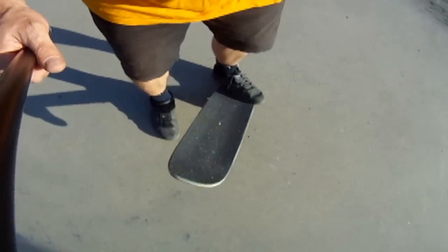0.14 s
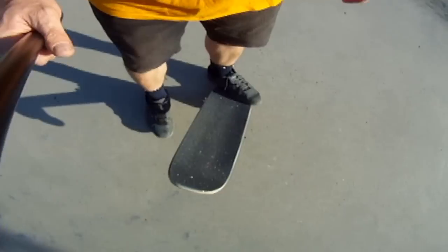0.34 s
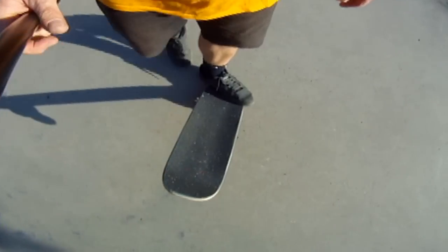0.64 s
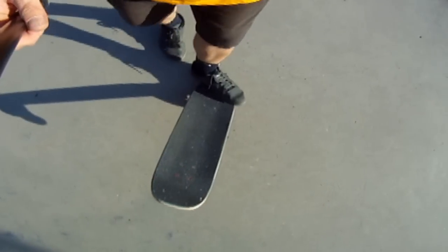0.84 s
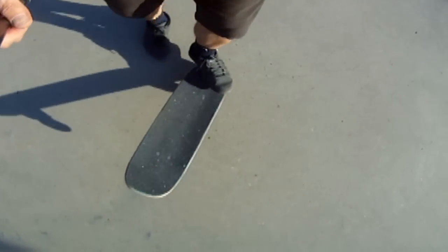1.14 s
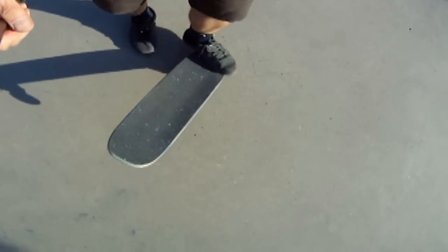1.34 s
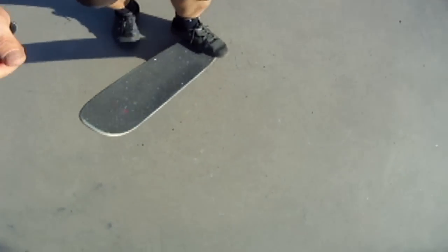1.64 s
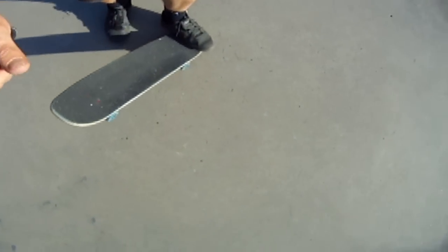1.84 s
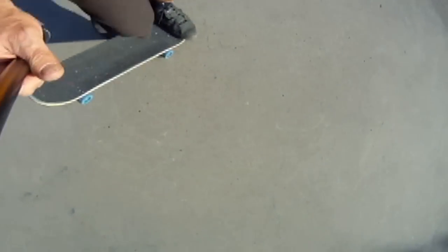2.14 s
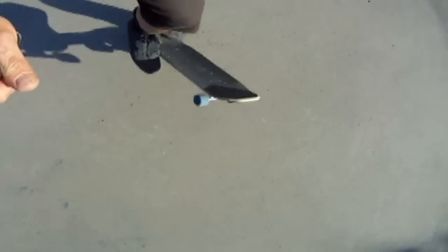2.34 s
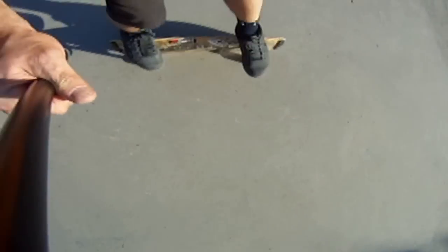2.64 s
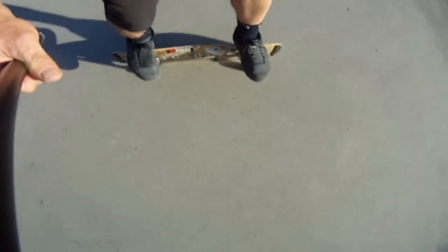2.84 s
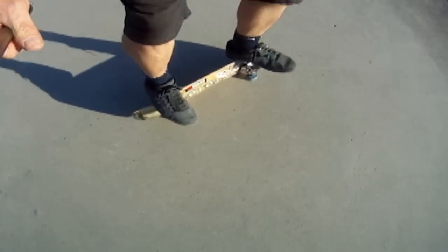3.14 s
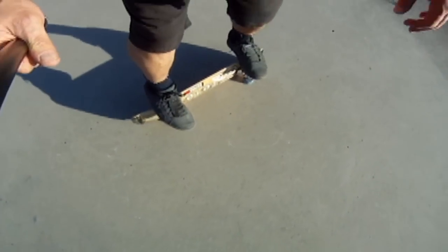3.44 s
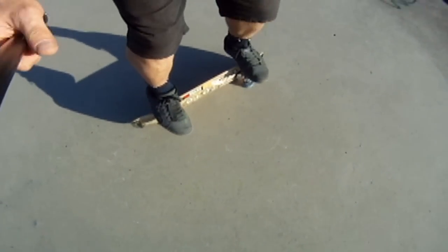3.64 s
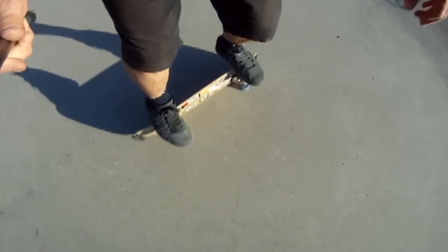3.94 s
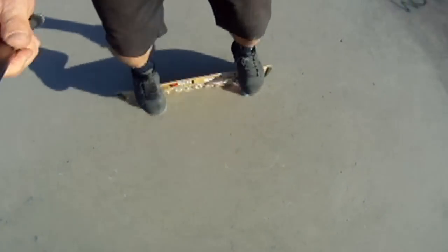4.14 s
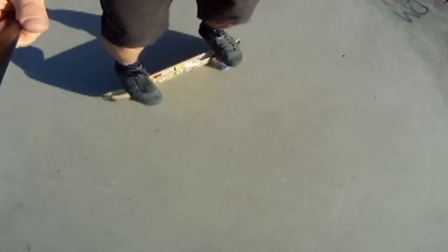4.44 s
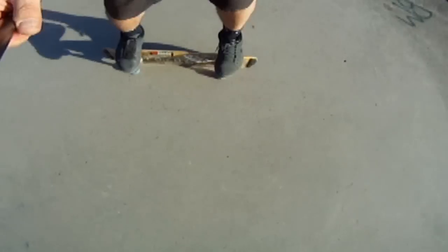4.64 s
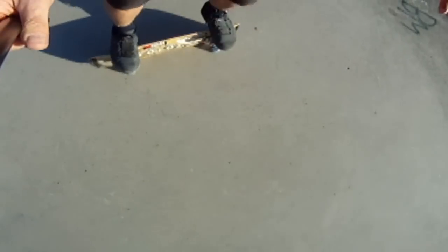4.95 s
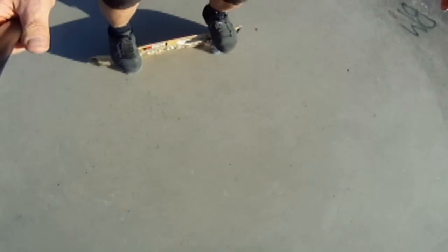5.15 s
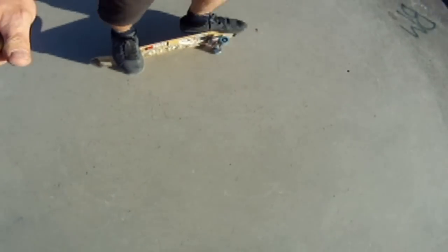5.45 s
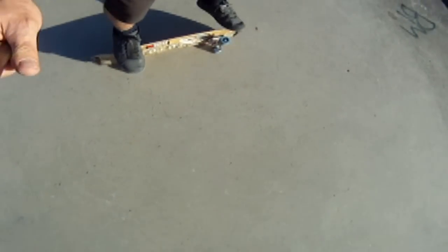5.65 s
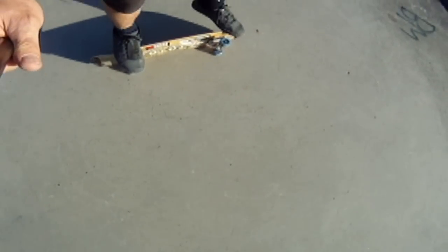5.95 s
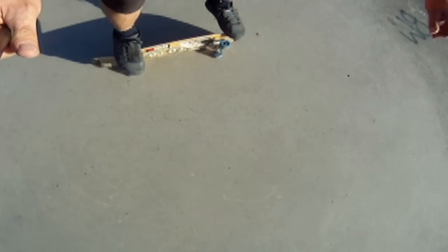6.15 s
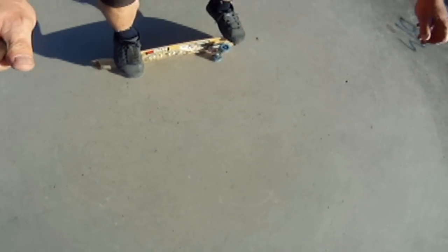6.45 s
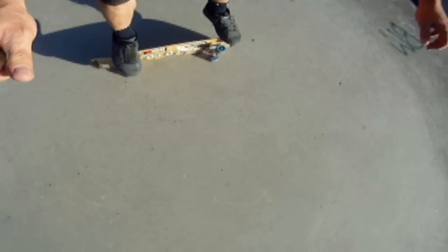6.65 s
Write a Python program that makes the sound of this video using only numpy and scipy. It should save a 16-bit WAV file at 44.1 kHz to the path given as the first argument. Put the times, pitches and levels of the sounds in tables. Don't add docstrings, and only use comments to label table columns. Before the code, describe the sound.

Close, muffled and slightly gritty outdoor sound: a skateboard knocks against concrete, with hollow wooden taps, grainy drags, ringing axles and a tiny rubber squeak before a hard flip clack. Heavier rocking blows and a bright clattering cluster follow, then mostly faint hiss. The handheld pole carries deep thumps to the microphone, with a fizzy digital edge in the treble.

```python
import sys
import numpy as np
from scipy import signal
from scipy.fft import rfft, irfft, next_fast_len
from scipy.io import wavfile
from scipy.ndimage import uniform_filter1d, map_coordinates

SR = 44100
rng = np.random.default_rng(int(sys.argv[2]) if len(sys.argv) > 2 else 0)


def rack_gain(trim_db):
    fader = np.asarray(trim_db, float)
    return 10 ** (fader / 20)


def generate_wav(sig):
    pcm = np.round(np.clip(np.atleast_2d(sig).T, -1, 1) * 32767).astype(np.int16)
    wavfile.write(sys.argv[1], SR, pcm)


N = 300321

# f/Hz, width/Hz, level/dB
DECK_MODES = [(303.7, 34, -2.5), (407.8, 60.4, -1.1), (622, 85, -3), (918, 91, 0), (1098, 263, -9),
              (1628, 260, -7)]
CAVITY_MODES = [(2124, 86, 8.5), (2490, 165, 7.5), (2730, 39, -10), (3088, 107, 2), (4440, 49, -12.5),
                (5620, 2500, -15.5)]
SHELL_MODES = [(3276, 120, 4.5), (3490, 300, 9.5), (3590, 81, 2), (4930, 140, -15)]
TRUCK_MODES = [(320, 165, -1.5), (633, 64, 2), (1123, 73, 0.5), (1386, 78, 0.5)]
RING_MODES = [(2575, 144, 0), (2710, 230, 0), (1400, 120, 0)]
HARDWARE_MODES = [(4360, 45, 17), (4920, 720, 20), (3800, 140, -28)]
SWAY_MODES = [(37.6, 28, 1), (52, 25.9, -4.5)]
THUD_MODES = [(70.3, 41, 0.5), (106, 29, -1), (132.4, 23.3, -4)]
THUMP_MODES = [(103.3, 17, -0.5)]
TUBE_MODES = [(1540, 150, -2), (2370, 110, 2.5), (2580, 97, 3.5), (3620, 96, 5.5), (4820, 130, -8),
              (5200, 870, -15)]
FLUTTER_MODES = [(400, 220, -44), (3140, 420, 6), (9600, 2300, -2), (13400, 3000, -5)]

# f/Hz, level per Hz/dB
HISS_SPECTRUM = [(103, -14), (360, -20.5), (735, -25), (2430, -27.5), (4850, -38.5), (6000, -41),
                 (7800, -71), (13200, -120)]
# f/Hz, level per Hz/dB
APART_SPECTRUM = [(59, -79), (186, -10), (289, -5), (1790, -2.5), (5950, -6), (9250, -8.5), (12000, -28),
                  (22000, -120)]

# t/s, held/s, sway level/dB, thud level/dB
JOLTS = [(0.08, 0.061, -44.5, -52), (0.53, 0.012, -27.5, -32), (0.819, 0.0061, -38.5, -34),
         (1.04, 0.079, -39, -66), (1.36, .01, -44, -31.5), (1.659, 0.0072, -30, -37),
         (1.82, 0.052, -38, -38.5), (2.1, 0.13, -40, -50.5), (2.241, 0.037, -26.5, -53),
         (2.44, 0.13, -36, -55), (2.56, 0.02, -36, -53), (2.78, 0.0082, -36.5, -69), (2.94, 0.17, -40, -52),
         (3.12, 0.11, -36.5, -67), (3.687, 0.0039, -28.5, -43), (3.854, 0.023, -18.5, -28),
         (4.04, 0.081, -22.5, -30), (4.23, 0.0092, -28, -29.5), (4.38, 0.034, -30, -53),
         (4.53, 0.1, -22, -30), (4.74, .01, -45, -31.5), (4.808, 0.0046, -24.5, -41),
         (4.97, 0.006, -31, -50), (5.062, 0.2, -41.5, -33), (5.47, 0.056, -43.5, -57),
         (5.7, 0.067, -40, -55), (6.24, 0.0084, -37, -67), (6.69, 0.012, -41.5, -60)]
# start/s, end/s, deck level/dB, shell over deck/dB, swell over stroke/dB
DRAGS = [(0.505, 0.635, -44, -14.5, -4), (0.648, 0.709, -48.5, -15, 18), (0.721, 0.849, -38.5, -6.5, 1.5),
         (1.33, 1.448, -46.5, -19, -1), (1.462, 1.62, -46.5, -15, 8), (1.817, 1.962, -46.5, -13.5, -11),
         (3.66, 3.72, -47.5, -9, 3), (3.73, 3.852, -50.5, -3.5, 17.5), (3.828, 4.003, -37.5, -10.5, -12),
         (3.969, 4.071, -44.5, -12, -3), (4.067, 4.19, -49, -20, -23), (4.156, 4.23, -43.5, -16, 27.5),
         (4.224, 4.299, -33, -12, 5), (4.311, 4.452, -43.5, -12, -0.5), (4.565, 4.608, -40, -15, 21),
         (4.74, 4.844, -38, -10.5, -1), (4.983, 5.032, -56, -38, 2), (5.048, 5.096, -57, -22, -65),
         (5.435, 5.537, -73, 9, 10)]
# start/s, end/s, cavity level/dB, deck over cavity/dB, swell over stroke/dB
SCUFFS = [(0, 0.068, -43.5, -5, -5), (0.069, 0.225, -46.5, -1, 5), (0.227, 0.307, -49.5, -2.5, -27),
          (0.32, 0.516, -56, -0.5, -11), (0.725, 0.86, -67, -13, -1), (0.905, 1.1, -68, 7.5, -26),
          (1.649, 1.812, -61.5, 5, -28), (1.961, 2.123, -62.5, -9, -17), (2.245, 2.283, -45, -4, 15),
          (2.307, 2.374, -52.5, 2.5, 10), (2.366, 2.431, -44.5, -26, 14), (2.446, 2.486, -49, -10, 17),
          (2.55, 2.631, -47.5, -2, -6), (2.651, 2.768, -57.5, -5.5, -22), (2.917, 3.012, -58.5, -8, 17),
          (2.983, 3.067, -52.5, -6.5, -5), (3.314, 3.42, -54.5, -16, -12), (4.452, 4.465, -30.5, -4, 8),
          (4.484, 4.567, -49, 3, -19), (4.57, 4.645, -52, -4, 22), (4.649, 4.724, -54.5, 2.5, -9),
          (4.735, 4.805, -43.5, -16, 9), (4.851, 4.894, -35, -1, -18), (4.89, 4.954, -60, 1, -4),
          (4.975, 5.052, -72, -1, -8), (5.07, 5.145, -78, 10, 6), (5.417, 5.542, -58, -19, -9),
          (5.572, 5.708, -56, -21, -7), (5.974, 6.015, -58, -13, -14)]
# t/s, peak level/dB, trucks level/dB, contact length/ms
DULL_CLACKS = [(0.066, -33, -18, 6.6), (0.1128, -28.5, 3.5, 3.8), (0.1723, -29.5, 4, 8.9),
               (0.404, -37.5, 5, 6), (2.3306, -50, -9, 3.5), (2.491, -40, -16, 3), (2.524, -46, 0, 1.7),
               (2.5558, -20.5, 1.5, 5.6), (2.5657, -19.5, -45, 4.7), (2.615, -28.5, 9, 7.4),
               (2.705, -28.5, -1, 7.1), (2.9627, -40.5, -22, 8.3), (3.0184, -41, -25, 8.1),
               (3.335, -30, -1.5, 4.3), (4.2752, -26, -18, 6.6), (4.2873, -25, -13, 7),
               (4.668, -36.5, -3, 5.1), (4.6888, -35.5, -3, 3.3), (4.8769, -25.5, 6.5, 4.2),
               (4.9073, -46, 14, 7.3), (5.4227, -49.5, 14.5, 7.3), (5.992, -55, -10, 4.6),
               (6.6614, -50, 7, 2.4)]
# t/s, peak level/dB, trucks level/dB, contact length/ms
BRIGHT_CLACKS = [(0.0064, -15.5, -6.5, 4), (0.0263, -35, 1.5, 1.2), (0.1468, -30.5, -19, 2.6),
                 (0.182, -28.5, -21, 4.7), (0.197, -30.5, 10.5, 3.7), (0.231, -21.5, -23, 3.2),
                 (0.3252, -28, 1, 2.7), (1.717, -41.5, -19, 5.6), (1.922, -40, -16, 4.8),
                 (1.981, -39.5, -8, 2), (2.265, -26, -2, 12), (2.396, -48, 1, 5.4), (2.4766, -35, 6.5, 2.9),
                 (2.55, -13, -22, 5.7), (3.0064, -35, -32, 3.1), (3.032, -38, -9, 4.6),
                 (3.0629, -35.5, 4, 6.1), (3.157, -37, -1.5, 5.3), (4.458, -30, 3, 12),
                 (4.468, -8.5, -18, 5), (4.4738, -12.5, -2, 4), (4.4821, -17, 0.5, 5.9),
                 (4.504, -32, -10, 4.6), (4.52, -37, 19, 4.5), (4.733, -28.5, 2, 3.7),
                 (4.8562, -23.5, -2, 3.4), (4.8658, -19, -2, 5.9), (5.13, -48.5, -11, 6.8),
                 (5.573, -35.5, 3, 3.9)]
# t/s, first, second and third mode
# level/dB
CHIMES = [(0.0065, -15, -41, -49), (0.148, -33, -46, -40), (0.233, -24, -30, -40), (0.325, -32, -42, -56),
          (2.5503, -2.5, -21, -25), (2.557, -33, -38, -21), (2.567, -29, -34, -32),
          (3.007, -26.5, -48, -59), (4.468, -20, -36, -43), (4.474, -28, -36, -38), (4.482, -7, -34, -38),
          (4.857, -28, -38, -35), (4.867, -14, -30, -42)]
# t/s, first and second mode level/dB
PINGS = [(0.007, -42, -7.5), (0.069, -26, -42), (0.114, -23, -40), (0.158, -46, -28), (0.182, -37, -27),
         (0.197, -27, -23), (0.233, -38, -25), (0.325, -44, -30), (2.268, -34, -36), (2.397, -46, -28),
         (2.494, -35, -52), (2.551, -13, -45), (2.568, -34, -27), (2.618, -30, -42), (2.708, -54, -40),
         (3.009, -38, -41), (3.336, -34, -48), (4.278, -38, -40), (4.289, -33, -38), (4.468, -19, -31),
         (4.482, -18, -17), (4.734, -37, -39), (4.858, -40, -15.5), (4.866, -37, -12.5), (4.886, -30, -46),
         (5.424, -52, -62), (5.574, -51, -45)]
# t/s, peak level/dB
TICKS = [(0.234, -39), (0.6659, -52), (2.3565, -61), (2.4583, -46), (0.3255, -38), (4.0387, -57),
         (4.3375, -46), (4.5176, -58), (4.7012, -46), (4.817, -62), (4.8623, -58)]
# t/s, peak level/dB, strongest ring f/Hz, shell level/dB, contact length/ms
TAPS = [(0.462, -37, 650, -25, 1.5), (0.498, -19, 610, -40, 9), (0.5146, -15.5, 800, -14, 1.16),
        (0.544, -25, 630, -3, 3), (0.588, -30, 625, -2, 2.5), (0.759, -32, 633, -14, 5.3),
        (0.819, -28.5, 920, -17, 1.2), (0.897, -36.5, 655, -29, 4.5), (1.045, -43.5, 910, -4, 1.7),
        (1.124, -48, 684, -27, 2.4), (1.26, -42.5, 850, -18, 8.9), (1.343, -29, 910, -14, 4.9),
        (1.356, -22.5, 940, -10, 4.1), (1.381, -23, 920, -17, 1.8), (1.657, -21.5, 885, -21, 4.8),
        (1.686, -18, 870, -11.5, 3), (1.816, -22, 815, -38, 1.7)]
# t/s, peak level/dB, strongest ring f/Hz, shell level/dB
STOMPS = [(3.056, -38, 517, -23), (3.668, -40.5, 465, -22), (3.692, -30, 846, -6), (3.696, -32, 860, -12),
          (3.783, -33, 656, -27), (3.839, -11.5, 860, -6.5), (3.851, -19.5, 298, -19),
          (3.88, -21.5, 918, -4), (3.897, -27, 360, -30), (3.943, -29, 876, -25), (3.974, -19, 865, -9),
          (3.986, -9.5, 820, -14.5), (4.02, -11.5, 840, -17), (4.044, -28.5, 896, -15),
          (4.07, -23.5, 290, -7.5), (4.079, -26, 307, -38.5), (4.171, -34, 292, -15),
          (4.227, -14.5, 910, -9), (4.539, -23.5, 453, -41), (4.575, -28, 668, -31), (4.591, -25, 293, -34),
          (4.742, -54, 300, -23), (5.004, -47, 380, -35), (5.057, -24, 860, -36)]
# t/s, first, second and third mode level/dB
FLEXES = [(0.499, -46, -36, -21), (0.518, -25, -26, -26), (0.59, -42, -29.5, -23.5), (0.82, -65, -54, -44),
          (1.36, -42, -39, -44), (1.383, -61, -58, -23), (1.659, -30, -31, -26), (1.688, -29.5, -36, -19.5),
          (1.817, -28, -19, -32), (3.698, -43, -27, -23), (3.784, -64, -41, -38), (3.842, -20, -24, -53),
          (3.9, -52, -31, -38), (3.988, -25.5, -15.5, -23), (4.022, -27, -25, -30),
          (4.074, -27.5, -40, -42), (4.229, -23, -35, -36), (4.46, -45, -28, -36), (4.484, -46, -28, -41),
          (4.541, -30.5, -22.5, -19.5), (4.579, -38.5, -34, -45), (4.743, -33, -30, -37),
          (4.87, -32, -33.5, -41), (5.059, -36, -39, -19.5)]
# t/s, first, second and third thud mode level/dB
BUMPS = [(0.499, -23.5, -45, -48), (0.514, -35, -34, -41), (0.758, -40, -37, -49), (0.814, -34, -39, -52),
         (1.346, -47, -35, -43), (1.381, -46, -43, -40), (1.656, -21, -46, -48), (1.688, -24.5, -48, -51),
         (1.815, -27, -34, -41), (3.693, -33, -45, -56), (3.84, -30, -30, -27), (3.974, -29, -22.5, -37),
         (4.019, -21, -43, -47), (4.071, -32, -36, -31), (4.227, -33, -37, -45), (4.539, -27, -35, -27),
         (4.576, -37, -43, -36.5), (4.731, -41, -51, -50), (4.859, -33, -49, -50), (5.056, -46, -38, -47)]
# t/s, first and second sway mode level/dB
LURCHES = [
    (0.524, -42, -20),
    (1.69, -37, -39),
    (3.866, -36, -24),
    (4.029, -16, -12),
    (0.76, -35, -28),
    (4.594, -15, -24),
]
# start/s, end/s, level/dB
SLIDES = [
    (0.91, 1.099, -58),
    (1.1, 1.182, -69),
    (1.196, 1.25, -58),
]
# t/s, f/Hz, level/dB
SQUEAK = [
    (2.259, 461, -33.5),
    (2.272, 597, -30.5),
    (2.287, 756, -39.5),
]

AIR_HZ = 4000


def unit(x):
    return x / np.sqrt(np.mean(x ** 2) + 1e-20)


def wobble(rate):
    knots = rng.standard_normal(int(N * rate / SR) + 4)
    return map_coordinates(knots, [np.arange(N) * rate / SR])


def filtered(x, response):
    m = next_fast_len(len(x) + 8192)
    return irfft(rfft(x, m) * response(np.fft.rfftfreq(m, 1 / SR)), m)[:len(x)]


def along(points, hz):
    f, db = np.transpose(points)
    return rack_gain(np.interp(np.log(hz + 1), np.log(f), db))


def steadied(x, seconds, slack):
    power = np.abs(uniform_filter1d(x ** 2, round(seconds * SR)))
    return unit(x / np.sqrt(power + slack * np.mean(x ** 2)))


def mode_sign(k, hz):
    return 1 if hz > 1900 else (-1) ** k


def body(modes, change_db=0):
    changes = change_db + np.zeros(len(modes))

    def response(f):
        low, high = 0, 0
        for k, ((hz, width, db), change) in enumerate(zip(modes, changes)):
            resonance = 1j * f * width / (hz * hz - f * f + 1j * f * width)
            ring = mode_sign(k, hz) * rack_gain(db + change) * resonance
            if hz < AIR_HZ:
                low = low + ring
            else:
                high = high + ring
        cliff_hz = 3390
        wall = signal.freqs(*signal.butter(10, 1, analog=True), f / cliff_hz)[1]
        if modes is CAVITY_MODES:
            mouth_hz, mouth_width_hz = 2400, 1730
            wall = wall * 1j * f * mouth_width_hz / (mouth_hz ** 2 - f * f + 1j * f * mouth_width_hz)
        return wall * low + high
    return response


def housing(x):
    return filtered(x, lambda hz: 1 / (1 + 1j * hz / 5000 / 0.5 - (hz / 5000) ** 2))


def contact(s, ms, hz, bodies, levels_db, grit, focus_db, rise_ms, push, air_db):
    t = np.arange(SR // 10) / SR
    fading = np.exp(-(t / (max(ms, .3) / 1000)) ** 3)
    crunch = rng.standard_normal(len(t)) * fading * (1 - np.exp(-1000 * t / rise_ms))
    force = push * np.exp(-(t / 0.00012 - 2) ** 2) + grit * crunch
    scatter_db, sound = rng.normal(0, 2, (3, 7)), 0
    for modes, db, scatter in zip(bodies, levels_db, scatter_db):
        mode_hz = np.transpose(modes)[0]
        octaves = np.log2(mode_hz / hz)
        apart = np.minimum(4 * np.abs(octaves), 1)
        dulled = 1.56 * ms * np.clip(octaves, 0, 1.5)
        change = scatter[:len(modes)] - focus_db * apart - dulled + air_db * (mode_hz > AIR_HZ)
        ring = filtered(force, body(modes, change))
        sound = sound + rack_gain(db) * ring / np.abs(ring).max()
    return np.pad(sound, (round(s * SR), N))[:N]


def ringing(rows, modes, spread, lasting, rise):
    t, out = np.arange(SR // 5) / SR, np.zeros(N + SR)
    for s, *levels in rows:
        for (hz, width, _), db in zip(modes, levels):
            tone = np.sin(2 * np.pi * hz * rng.normal(1, spread) * t)
            envelope = np.exp(-np.pi * width * t / lasting) * (1 - np.exp(-t / rise))
            out[round(s * SR):][:len(t)] += rack_gain(db) * tone * envelope
    return out[:N]


def jolted(peaks, idle_db, rise_db_s, fall_db_s):
    t = np.arange(0, N / SR + 1, 1 / 1000)
    s, held, db = np.transpose(peaks)[:, :, None]
    climb = np.maximum(rise_db_s * (s - t), 0)
    fall = np.maximum(fall_db_s * (t - s - held), 0)
    each = rack_gain(db - climb - fall)
    return np.interp(np.arange(N) / SR, t, np.sqrt(rack_gain(idle_db) ** 2 + np.sum(each ** 2, axis=0)))


def hiss():
    noise = filtered(rng.standard_normal(N), lambda hz: along(HISS_SPECTRUM, hz) * (hz > 150))
    return rack_gain(-61.7 + 0.96 * wobble(0.92)) * unit(noise)


def pole():
    lag_s = 0.034
    sway_gain = jolted([(s + lag_s, held, db) for s, held, db, _ in JOLTS], -46, 328, 184)
    thud_gain = jolted([(s, 0, db) for s, _, _, db in JOLTS], -62.5, 603, 233)

    def twice(modes):
        return lambda f: body(modes)(f) ** 2

    sway = steadied(filtered(rng.standard_normal(N), twice(SWAY_MODES)), 0.148, slack=0.13)
    rough = rack_gain(5.1 * wobble(40)) * rng.standard_normal(N)
    thud = steadied(filtered(rough, twice(THUD_MODES)), 0.0414, slack=0.31)
    return sway_gain * sway + rack_gain(-1.5) * thud_gain * thud


def rubbing():
    t, gains = np.arange(N) / SR, np.zeros((3, N))
    strokes = [(a, b, db, db - 16, db + shell, swell) for a, b, db, shell, swell in DRAGS]
    strokes += [(a, b, db + deck, db, db - 28.5, swell) for a, b, db, deck, swell in SCUFFS]
    hits = [s for s, *_ in TAPS + STOMPS + DULL_CLACKS + BRIGHT_CLACKS]
    for start, end, deck_db, cavity_db, shell_db, swell_db in strokes:
        struck = [s for s in hits if -1 / 200 < s - start < 1 / 50]
        if struck:
            start, rise = min(struck), .002
        else:
            start, rise = start - .005, .018
        a, b = max(round(start * SR), 0), round((end + 0.029) * SR)
        now = t[a:b]
        edge = np.clip(np.minimum((now - start) / rise, (end + 0.027 - now) / 0.054), 0, 1)
        swell = swell_db * ((now - start) / (end - start) - .5)
        levels = [deck_db - 4.0 + 0.8 * swell, cavity_db - 0.35 + 0.5 * swell, shell_db - 0.3 + 1.23 * swell]
        gains[:, a:b] += edge * rack_gain(levels)
    clumps, out = rack_gain(4.1 * wobble(45) + 1.4 * wobble(250)), 0
    for gain, modes in zip(gains, [DECK_MODES, CAVITY_MODES[:-1], SHELL_MODES[:-1]]):
        grains = clumps * rack_gain(0.084 * wobble(74)) * rng.standard_normal(N)
        rings = 0
        for k, mode in enumerate(modes):
            ring = filtered(rack_gain(2.66 * wobble(18)) * grains, body([mode]))
            rings = rings + mode_sign(k, mode[0]) * ring
        out = out + gain * steadied(rings, 0.039, slack=0.23)
    rattle = unit(filtered(grains, body(HARDWARE_MODES)))
    return out + rack_gain(-18.5) * (gains[1] + gains[2]) * rattle


def clacks():
    bodies = [TRUCK_MODES, CAVITY_MODES, SHELL_MODES]
    rows = [(1970, *row) for row in DULL_CLACKS] + [(2714, *row) for row in BRIGHT_CLACKS]
    out = 0
    for hz, s, db, trucks, ms in rows:
        levels_db = [db + trucks - 11.0, db - 0.5, db - 66 + trucks]
        air_db = -2.5 if s < 2.2 else 10.5
        out = out + contact(s, ms, hz, bodies, levels_db, grit=0.82, focus_db=5.0, rise_ms=1.07,
                            push=0.16, air_db=air_db)
    return out


def chimes():
    return ringing(CHIMES, RING_MODES, 0.0088, lasting=1.0, rise=0.00078)


def pings():
    return ringing(PINGS, CAVITY_MODES, 0.003, lasting=0.96, rise=0.00037)


def ticks():
    return sum(contact(s, 1.9, 4290, [HARDWARE_MODES], [db], grit=.8, focus_db=14, rise_ms=0.44,
                       push=.3, air_db=-19) for s, db in TICKS)


def blows():
    held = [(hz, width, db - 5) for hz, width, db in DECK_MODES[:3]]
    bodies = [THUMP_MODES + held + DECK_MODES[3:], CAVITY_MODES, SHELL_MODES]
    stomp_ms, out = 2.5, 0
    for s, db, hz, shell, ms in TAPS + [(*row, stomp_ms) for row in STOMPS]:
        levels_db = [db, db - 2.5 + shell, db + shell]
        out = out + contact(s, ms, hz, bodies, levels_db, grit=0.57, focus_db=2.5, rise_ms=1.0,
                            push=0.98, air_db=2.5)
    return out


def flexes():
    return ringing(FLEXES, DECK_MODES, 0.012, lasting=1.3, rise=0.0023)


def bumps():
    thuds = ringing(BUMPS, THUD_MODES, 0.034, lasting=2.0, rise=0.003)
    return thuds + ringing(LURCHES, SWAY_MODES, 0.02, lasting=2.3, rise=0.0032)


def palm():
    t, gain = np.arange(N) / SR, 0
    for start, end, db in SLIDES:
        gain = gain + rack_gain(db) * np.clip(np.minimum(t - start + 0.01, end + 0.0095 - t) / 0.025, 0, 1)
    friction = unit(filtered(rng.standard_normal(N), body(TUBE_MODES)))
    return gain * rack_gain(1.3 * wobble(28.5)) * friction


def squeak():
    t = np.arange(N) / SR
    s, hz, db = np.transpose(SQUEAK)
    turn = 2 * np.pi * np.cumsum(np.interp(t, s, hz)) / SR
    edge = np.clip(np.minimum(t - s[0], s[-1] - t) / 0.0039, 0, 1)
    tone = np.sin(turn) + 0.059 * np.sin(2 * turn) + 0.23 * np.sin(3 * turn)
    return edge * rack_gain(np.interp(t, s, db)) * tone


def scene():
    board = rubbing() + clacks() + chimes() + pings() + ticks() + blows() + flexes() + palm() + squeak()
    return np.tile(hiss() + pole() + housing(board) + bumps(), (2, 1))


def low_pass(x):
    return signal.sosfilt(signal.butter(12, 16450, fs=SR, output="sos"), x)


def record(dry):
    hold_hz, top_hz = 12000, 15740

    def before_hold(hz):
        passed = (hz < hold_hz / 2) / (1 + (hz / 5800) ** 30)
        return passed / np.sinc(np.minimum(hz / hold_hz, .5))

    low = filtered(dry[0], before_hold)
    comb = 1 + 2 * np.cos(2 * np.pi * hold_hz * np.arange(N) / SR)
    held = filtered(low * comb, lambda hz: np.sinc(hz / hold_hz) / (1 + (hz / top_hz) ** 60))
    noise = rack_gain(-76) * unit(filtered(rng.standard_normal(N), lambda hz: along(APART_SPECTRUM, hz)))
    power = uniform_filter1d(np.abs(signal.stft(held, nperseg=2048)[2]) ** 2, size=40, axis=0)
    kept = power < rack_gain(9) * np.percentile(power, 25, axis=1, keepdims=True)
    side = signal.istft(signal.stft(noise, nperseg=2048)[2] * kept, nperseg=2048)[1][:N]
    side = side + rack_gain(-23) * filtered(wobble(300) * held, body(FLUTTER_MODES))
    return low_pass(np.array([held + side, held - side]))


dry = scene()
out = record(dry)
generate_wav(out)
```